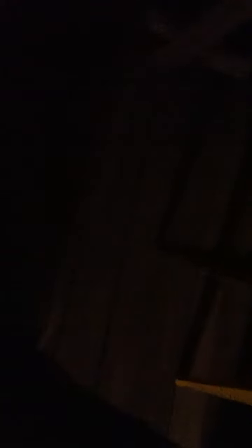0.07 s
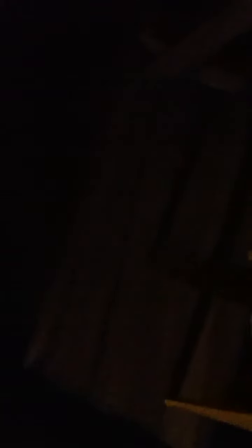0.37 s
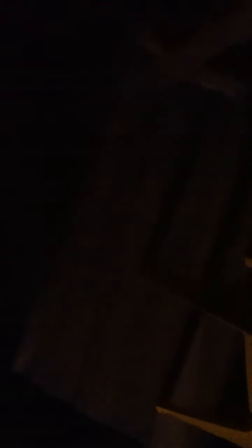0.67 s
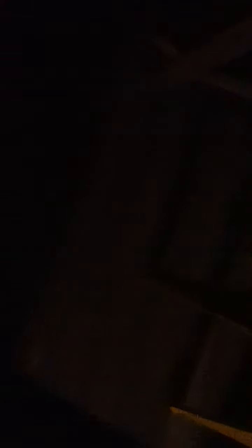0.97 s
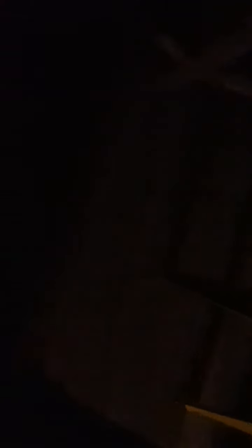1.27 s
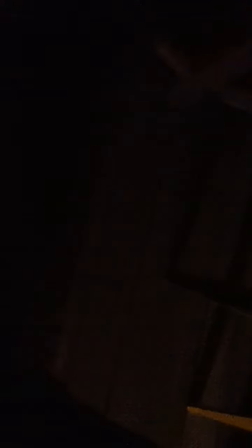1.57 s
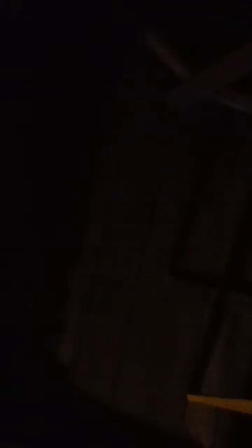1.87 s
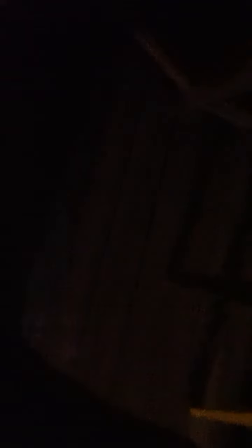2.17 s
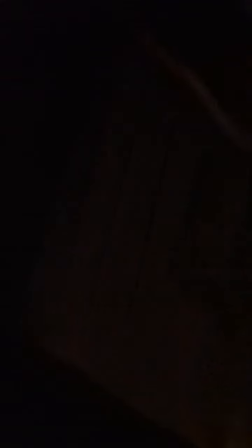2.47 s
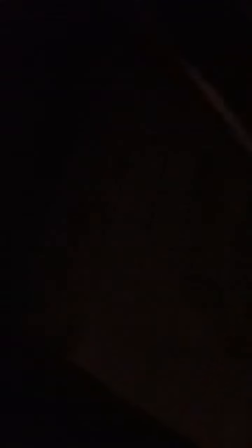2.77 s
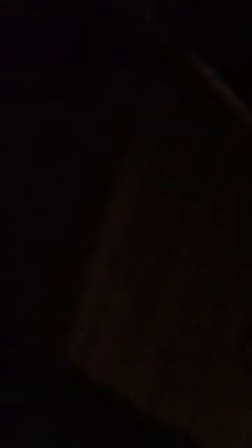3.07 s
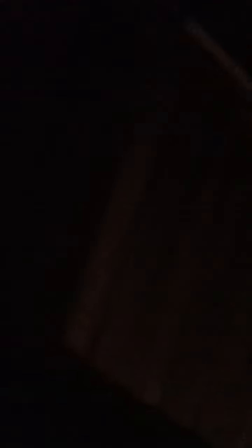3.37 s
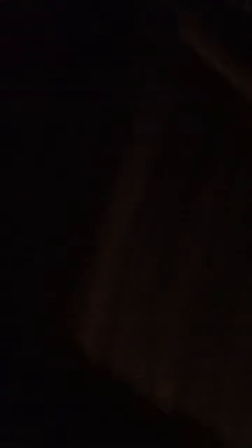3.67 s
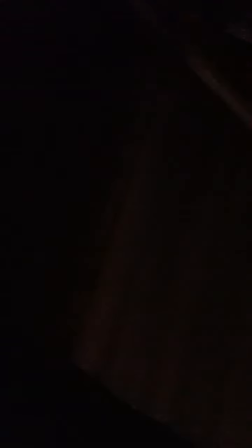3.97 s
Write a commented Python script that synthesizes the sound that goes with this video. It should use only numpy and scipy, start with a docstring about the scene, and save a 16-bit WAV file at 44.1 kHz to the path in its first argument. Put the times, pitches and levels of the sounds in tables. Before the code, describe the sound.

A small animal, perhaps a raccoon, chatters angrily in three bouts of raspy whines, spits and squeals, after a few dry ticks. The calls echo between hard walls at night, over faint hiss and distant rumble.

```python
"""Between hard walls at night, a small animal, perhaps a raccoon, chatters angrily in three bouts.
A distant rumble and a faint hiss lie underneath, and a few dry ticks come first.
Each bout is a run of short syllables: shaky vocal folds and rushing air make a raspy whine near 1 kHz
that, in the later two, breaks up into a squeal and falls back. Toneless spits break in between.
The walls echo the ticks and the animal."""
import sys
import numpy as np
from scipy import signal
from scipy.fft import rfft, irfft, next_fast_len
from scipy.io import wavfile
from scipy.ndimage import map_coordinates

SR = 44100
rng = np.random.default_rng(int(sys.argv[2]) if len(sys.argv) > 2 else 0)


def generate_wav(signal):
    """Clip the signal to [-1, 1] and save it as 16-bit WAV at the path in sys.argv[1]."""
    frames = np.transpose(np.atleast_2d(signal))
    scaled = np.clip(frames, -1, 1) * 32767
    pcm = np.round(scaled).astype(np.int16)
    wavfile.write(sys.argv[1], SR, pcm)


N = 176400
TIME_S = np.arange(N) / SR


def amp(db):
    """Turn decibels into a gain to multiply by."""
    return 10 ** (np.asarray(db) / 20)


def unit(x):
    """Scale a signal to an average (rms) level of 1."""
    return x / np.sqrt(np.mean(x ** 2) + 1e-20)


def along(points, hz):
    """Read between the rows of a frequency table, on a log scale."""
    freqs, values = np.transpose(points)
    return np.interp(np.log(hz + 1), np.log(freqs + 1), values)


def wobble(rate):
    """A smooth curve through `rate` random values a second."""
    return map_coordinates(rng.standard_normal(N // 10), [TIME_S * rate], mode="wrap")


def filtered(x, response):
    """Turn each frequency up or down by the gain response(hz)."""
    size = next_fast_len(N + SR // 2)
    return irfft(rfft(x, size) * response(np.fft.rfftfreq(size, 1 / SR)), size)[:N]


def noise(colour):
    """Noise at level 1; the colour table says which frequencies are stronger."""
    return unit(filtered(rng.standard_normal(N), lambda hz: amp(along(colour, hz))))


# Tone of the night air: frequency_hz, relative_db
NIGHT_COLOUR = [(20, -37), (40, -13), (65, -7.5), (100, -2.5), (125, -3), (170, -1.5), (250, -8.5),
                (340, -13), (500, -16), (750, -19), (1600, -23), (2800, -25.5), (4800, -27), (9000, -28.5),
                (13700, -31), (15800, -34.5)]
# How the rumble rises and falls: time_s, change_db
RUMBLE_SWELL = [(0, 2), (1.05, 1), (1.3, -1), (1.55, -0.5), (1.9, -0.5), (2.3, 0.5), (3.3, 0.5), (3.8, 2.5)]

def night(level_db=-56, rumble_below_hz=400):
    """A gently swelling distant rumble under an even hiss."""
    air = noise(NIGHT_COLOUR)
    rumble = filtered(air, lambda hz: 1 / (1 + (hz / rumble_below_hz) ** 4))
    swell_db = np.interp(TIME_S, *np.transpose(RUMBLE_SWELL))
    return amp(level_db) * (air + (amp(swell_db) - 1) * rumble)


# One row a tick: start_s, level_db (before trim_db is added)
TICKS = [(0.414, -49), (0.44, -45), (.509, -38), (.533, -42.5), (.581, -43.5), (0.599, -44)]
# Tone of a tick: frequency_hz, relative_db
TICK_COLOUR = [(200, -18), (800, -12), (1200, -9), (1750, -1), (2300, -13), (2900, -14), (4000, -16.5),
               (7000, -36), (14000, -41)]

def ticks(fade_s=0.026, trim_db=-6.5):
    """Short dry ticks, perhaps claws on wood; each drops 60 dB in fade_s."""
    gain = np.zeros(N)
    for start_s, level_db in TICKS:
        age_s = TIME_S - start_s
        gain += (age_s >= 0) * amp(level_db + trim_db - 60 * np.abs(age_s) / fade_s)
    return gain * noise(TICK_COLOUR)


# How long the walls ring: frequency_hz, fade_s (time to drop 60 dB)
WALL_FADE = [(300, 1.2), (1900, 1.06), (3000, 1.15), (4000, 1.01), (10000, 0.36)]

def echo(tail_db=-8, tail_rise_s=0.012, near_db=-10, near_rise_s=0.0066, near_fade_s=0.15):
    """One echo pattern: a quick answer from near surfaces and a longer tail whose treble dies first."""
    hz, frame_s, spectrum = signal.stft(rng.standard_normal(SR), SR, nperseg=256)
    spectrum *= amp(-60 * frame_s / along(WALL_FADE, hz)[:, None])
    tail = signal.istft(spectrum, SR, nperseg=256)[1][:SR]
    t = TIME_S[:SR]
    tail *= 1 - np.exp(-(t / tail_rise_s) ** 2)
    near = rng.standard_normal(SR) * amp(-60 * t / near_fade_s)
    near *= 1 - np.exp(-(t / near_rise_s) ** 2)
    return amp(tail_db) * tail / np.linalg.norm(tail) + amp(near_db) * near / np.linalg.norm(near)


# The thin tone of the echoes: frequency_hz, gain_db
ECHO_COLOUR = [(500, -7), (1000, -5.5), (1700, -1), (3500, 3), (9000, 9.5)]

def walls(x, shift_s=0.12):
    """The echoes change their pattern every shift_s as the animal and the listener move."""
    hop = int(shift_s * SR)
    padded, echoes = np.pad(x, (0, 2 * hop)), np.zeros(N + 2 * hop + SR)
    crossfade = np.sin(np.pi * np.arange(2 * hop) / (2 * hop))
    for i in range(0, N, hop):
        part = signal.fftconvolve(padded[i:i + 2 * hop] * crossfade, echo())
        echoes[i:i + len(part)] += part
    return filtered(echoes[:N], lambda hz: amp(along(ECHO_COLOUR, hz)))


def sputter(depth_db=2, rate_hz=200):
    """The quick, random flicker in the level of the animal's breath."""
    return amp(depth_db * wobble(rate_hz))


# One row a spit: start_s, level_db, fade_s (time to drop 60 dB)
SPITS = [(0.771, -58, 0.51), (2.188, -49, .16), (2.293, -50, 0.15), (3.467, -45.5, .18),
         (3.71, -45.5, 0.19), (3.892, -46.5, 0.11)]
# Tone of a spit: frequency_hz, relative_db
SPIT_COLOUR = [(350, -20), (650, -9.5), (1250, -1.5), (2400, -5), (4000, -14.5), (7000, -26), (14000, -38)]

def spits(rise_s=0.0028):
    """Toneless, sputtering puffs: each starts suddenly and dies away."""
    gain = np.zeros(N)
    for start_s, level_db, fade_s in SPITS:
        age_s = TIME_S - start_s
        gain += np.clip(age_s / rise_s, 0, 1) * amp(level_db - 60 * np.abs(age_s) / fade_s)
    return gain * unit(noise(SPIT_COLOUR) * sputter())


# One row a syllable: start_s, length_s, voice_db (before the throat), rasp_db, roughness_0_to_1, treble_db
SYLLABLES = [ (.815, 0.026, -51, -54.5, 0.29, 5), (.845, 0.025, -51, -55.5, 0.24, 6),
             (.877, 0.021, -54, -57, 0.27, 2), (.905, .026, -55, -58, .2, 4),
             (0.93, 0.026, -48, -51.5, 0.31, -7), (0.953, 0.031, -41.5, -49, 0.63, -5.5),
             (.991, .018, -51, -51.5, 0.59, 6), (1.015, 0.029, -46.5, -53, .5, -3),
             (1.059, 0.045, -45.5, -57, 0.33, 0), (1.101, 0.025, -56, -59, 0.53, -1),
             (1.126, 0.025, -43, -60, 0.2, -2), (1.661, 0.07, -59, -56, 0.56, 3.5),
             (1.671, 0.02, -41, -68, 0.06, -33), (1.728, 0.028, -39.5, -54, 0.23, 7.5),
             (1.752, 0.024, -49, -48.5, 0.27, 6), (1.787, .024, -32.5, -46, .3, 6),
             (1.817, 0.03, -41.5, -44, .55, 15), (1.851, 0.019, -27.5, -43.5, 0.25, 0.5),
             (1.88, 0.03, -38, -44, 0.56, 5.5), (1.919, 0.025, -48, -56, 0.57, 9.5),
             (1.942, 0.024, -36, -59, 0.28, 2.5), (1.97, 0.04, -56, -53.5, 0.59, 17.5),
             (2.008, 0.015, -38, -52, 0.22, -12), (2.025, 0.037, -54.5, -62, 0.49, 15),
             (2.064, 0.018, -43.5, -49, 0.2, 3), (2.101, 0.026, -50.5, -55.5, 0.74, 12.5),
             (2.141, .021, -37, -52, .22, -3), (2.162, 0.064, -56, -50, 0.77, -3),
             (2.23, .043, -48.5, -50, 0.31, -12), (2.294, 0.038, -56, -58, 0.55, 12.5),
             (2.359, .017, -47, -47, 0.41, 5), (2.436, 0.038, -46, -49.5, 0.37, 0),
             (2.498, 0.038, -51, -52, 0.43, 0), (2.541, 0.029, -55.5, -58.5, 0.94, -15),
             (2.951, .110, -63.5, -64, 0.61, -10), (3.072, .014, -50, -53.5, .7, -5),
             (3.088, 0.0377, -62, -58.5, 0.7, -2), (3.135, 0.034, -48.5, -57, 0.29, 6.5),
             (3.171, .026, -52, -56, 0.24, 8), (3.204, .016, -41, -53, 0.24, 3),
             (3.235, .02, -30.5, -41.5, 0.36, -3), (3.256, 0.035, -36.5, -42, .6, -4.5),
             (3.286, .032, -35.5, -41.5, .6, -5.5), (3.326, 0.015, -37, -45, 0.49, 0.5),
             (3.332, 0.034, -36, -45.5, 0.32, -0.5), (3.377, .039, -39, -50, 0.25, 6.5),
             (3.415, 0.047, -50, -52.5, 0.39, 1), (3.474, 0.0264, -46, -52, .55, 5),
             (3.507, .016, -47, -55, .5, 3), (3.532, .024, -38, -50, 0.36, -2),
             (3.567, .019, -39, -50, 0.33, -1.5), (3.603, .017, -35.5, -51, .33, -1),
             (3.637, .02, -38.5, -60, .25, 3.5), (3.668, .037, -47.5, -56, 0.17, 8.5),
             (3.707, 0.033, -43.5, -47.5, 0.79, -14), (3.773, 0.031, -44, -50.5, 0.39, -12),
             (3.89, .021, -51, -51, 0.71, 0), (3.924, 0.017, -43.5, -49, 0.2, -7),
             (3.956, 0.018, -41.5, -54, 0.41, 0.5), (3.993, 0.02, -38, -46, 0.31, -10)]

def syllables(rise_s=0.0099, fall_s=0.011):
    """Each syllable swells, holds and fades; gives voice gain, rasp gain, roughness and treble lift."""
    voice_gain, rasp_gain, rough, treble, weight = np.zeros((5, N))
    for start_s, length_s, voice_db, rasp_db, roughness, treble_db in SYLLABLES:
        rise = np.clip((TIME_S - start_s) / rise_s + 0.1888, 0, 1)
        fall = np.clip((start_s + length_s - TIME_S) / fall_s + 0.17, 0, 1)
        shape = np.sin(np.pi / 2 * rise * fall)
        voice_gain += amp(voice_db) * shape
        rasp_gain += amp(rasp_db) * shape
        rough += roughness * shape
        treble += treble_db * shape
        weight += shape
    weight += 1e-9
    return voice_gain, rasp_gain, rough / weight, treble / weight


def mouth_treble(hz, edge_hz=2580):
    """An opening mouth lifts the treble: 0 well below edge_hz, 1 well above."""
    return .5 + .5 * np.tanh(6 * np.log((hz + 1) / edge_hz))


# How the throat and mouth shape the voice: frequency_hz, gain_db
THROAT = [(600, -29), (930, -9.5), (1010, -18), (1200, -17.5), (1500, -12), (1850, -3), (2080, -5.5),
          (2400, -10.5), (2950, -12.5), (3500, -12.5), (4100, -18.5), (4700, -17), (5300, -35),
          (6200, -37.5), (7500, -44), (9300, -68)]

def vocal_folds(pitch_hz, rough, treble_db, jitter_hz=480, lurch_hz=170, flutter_hz=240):
    """Vocal folds buzz through the throat; the rougher they are, the more pitch and level shake."""
    unsteady = 0.03 * wobble(jitter_hz) + 0.0549 * wobble(lurch_hz)
    phase = 2 * np.pi * np.cumsum(pitch_hz * (1 + rough * unsteady)) / SR
    shared_flutter, voice = wobble(flutter_hz), np.zeros(N)
    for k in range(1, 8):  # harmonic k is a tone at k times the pitch
        throat_db = along(THROAT, k * pitch_hz) + treble_db * mouth_treble(k * pitch_hz)
        flutter_db = 7.5 * rough * (0.77 * shared_flutter + 0.26 * wobble(flutter_hz) - .5 * rough)
        loss_db = 2 * max(k - 3, 0)  # harmonics past the third get weaker
        blur_radians = 0.62 * k * rough * wobble(jitter_hz)
        voice += np.sqrt(2) * amp(throat_db + flutter_db - loss_db) * np.sin(k * phase + blur_radians)
    return voice


# Tone of the fizz: frequency_hz, relative_db
FIZZ_COLOUR = [(3000, -28), (4500, 2), (6200, 11), (7400, 3), (9000, 14), (11000, 8), (14000, -5)]

def fizz(relative_db=-35.5):
    """The high hiss of a voice pushed hard."""
    return amp(relative_db) * noise(FIZZ_COLOUR)


# Tone of the rasp: frequency_hz, relative_db
RASP_COLOUR = [(200, -24), (600, -12.5), (900, -23.5), (1200, -7.5), (1650, 11), (2050, 1.5), (2500, 2),
               (3000, 3.5), (3500, 1.5), (4200, -6), (5000, -11.5), (6000, -21), (9500, -27), (14000, -42)]

def rasp(pitch_hz, rough, treble_db, band_width=0.33):
    """Swirling air: bands of noise follow the harmonics and spread into a hiss as the voice roughens."""
    cycles = np.cumsum(pitch_hz) / SR
    lift_db = 0.36 * treble_db  # only part of the mouth's lift reaches the rasp
    bands, power = np.zeros((2, N))
    for k in range(1, 7):
        position = [cycles * band_width * np.sqrt(k)]  # band_width: the first band, as a share of pitch
        a, b = (map_coordinates(row, position, mode="wrap") for row in rng.standard_normal((2, N // 10)))
        phase = 2 * np.pi * k * cycles
        gain = amp(along(RASP_COLOUR, k * pitch_hz))
        lift = amp(lift_db * mouth_treble(k * pitch_hz))
        bands += gain * lift * (a * np.cos(phase) + b * np.sin(phase))
        power += gain ** 2
    air = noise(RASP_COLOUR)
    hiss = air + (amp(lift_db) - 1) * filtered(air, mouth_treble)
    hiss_share = 0.96 * rough
    breath = np.sqrt((1 - hiss_share) / power) * bands + np.sqrt(hiss_share) * hiss
    return breath * unit(sputter())


# The tune of the three bouts: time_s, pitch_hz
CHATTER_PITCH = [(.8, 980), (.93, 980), (.955, 906), (.975, 885), (1.0, 986), (1.031, 921), (1.064, 979),
                 (1.096, 925), (1.125, 979), (1.16, 1000), (1.66, 1330), (1.681, 1500), (1.715, 1500),
                 (1.731, 1790), (1.775, 1800), (1.80, 1975), (1.832, 2130), (1.863, 2015), (1.885, 1965),
                 (1.901, 2092), (1.924, 1750), (2.016, 1760), (2.04, 1670), (2.092, 1750), (2.102, 1400),
                 (2.126, 1398), (2.138, 1140), (2.21, 1080), (2.24, 910), (2.33, 870), (2.37, 1260),
                 (2.447, 770), (2.465, 900), (2.52, 1160), (2.55, 900), (3.07, 980), (3.141, 1330),
                 (3.168, 1330), (3.18, 1690), (3.219, 1690), (3.25, 1840), (3.295, 1670), (3.31, 1810),
                 (3.334, 1700), (3.460, 1670), (3.47, 1250), (3.545, 1160), (3.585, 1180), (3.65, 1400),
                 (3.70, 1380), (3.72, 950), (3.78, 1005), (3.935, 1010), (3.964, 1070), (4.0, 1020)]

def chatter():
    """The animal's whine and squeal: a fizzy voice and raspy breath, chopped into syllables."""
    voice_gain, rasp_gain, rough, treble_db = syllables()
    pitch_hz = np.interp(TIME_S, *np.transpose(CHATTER_PITCH))
    voice = vocal_folds(pitch_hz, rough, treble_db) + fizz()
    return voice_gain * voice + rasp_gain * rasp(pitch_hz, rough, treble_db)


def scene():
    """The animal and the ticks between the walls, over the night air."""
    direct = chatter() + spits() + ticks()
    return (direct + walls(direct) + night())[None]


def record(dry):
    """Cut away the very highest treble."""
    top_hz = 15850
    return filtered(dry[0], lambda hz: hz < top_hz)[None]


dry = scene()
out = record(dry)
generate_wav(out)
```